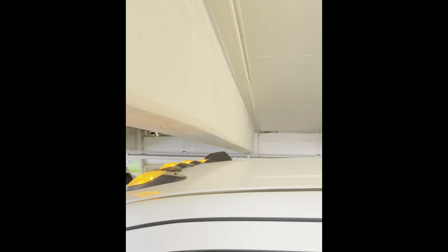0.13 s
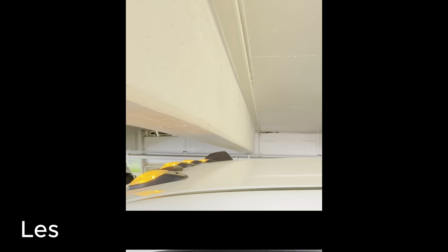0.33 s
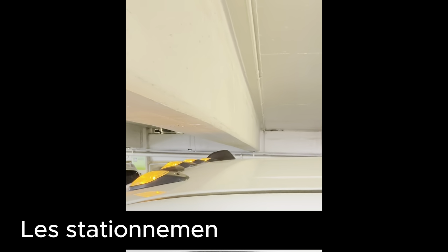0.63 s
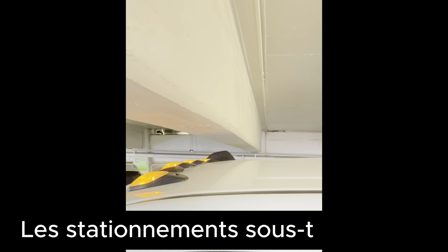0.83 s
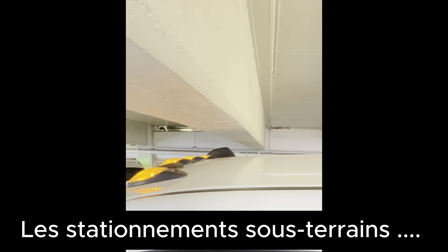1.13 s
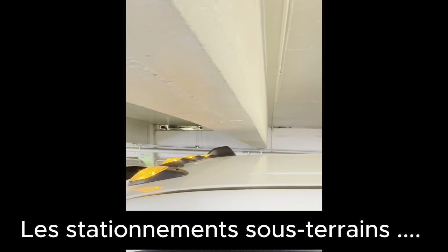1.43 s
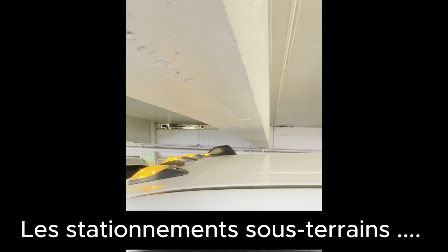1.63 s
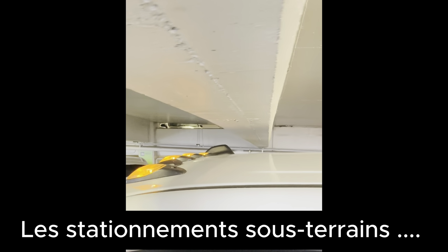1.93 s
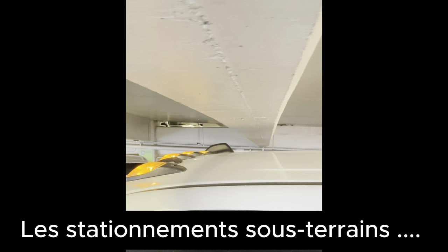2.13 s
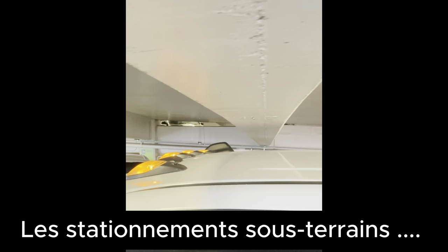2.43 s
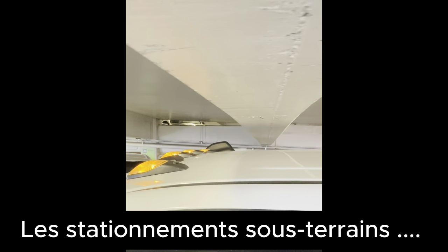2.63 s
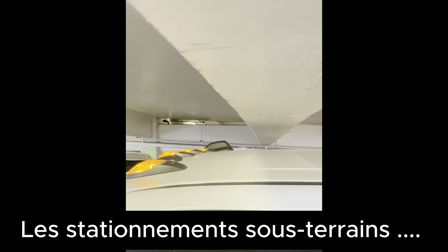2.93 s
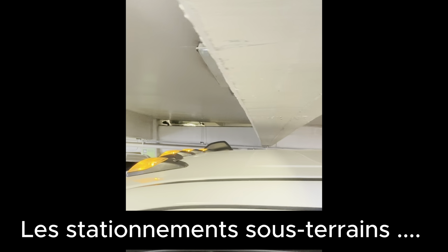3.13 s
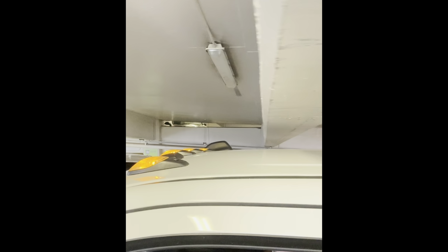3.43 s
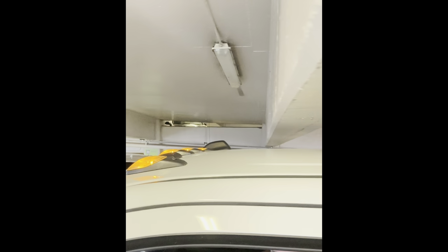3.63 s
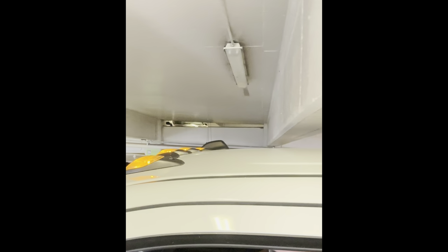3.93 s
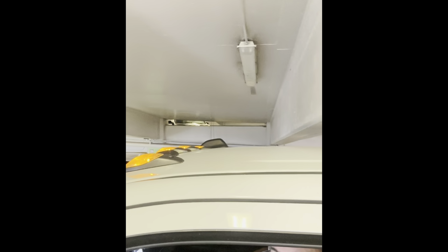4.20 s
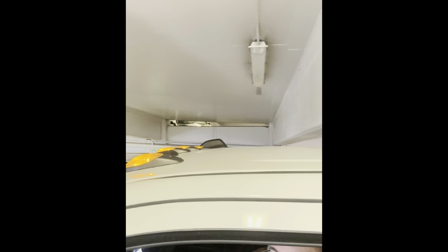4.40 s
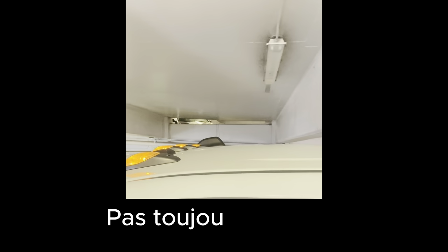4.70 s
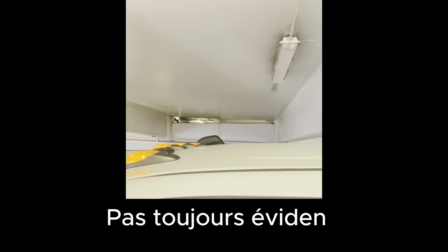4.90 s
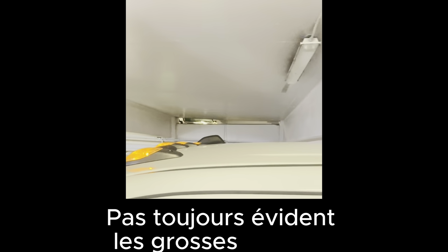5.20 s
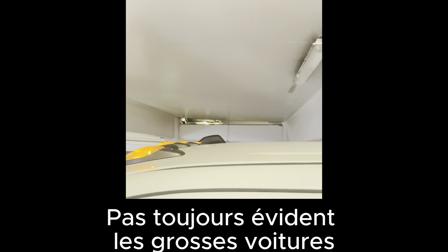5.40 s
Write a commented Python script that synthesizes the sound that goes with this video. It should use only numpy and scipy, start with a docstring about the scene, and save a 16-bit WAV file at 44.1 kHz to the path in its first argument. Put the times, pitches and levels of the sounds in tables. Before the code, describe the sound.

A big truck engine booms deep and steady at a fast idle, swelling and fading as it creeps through an echoing concrete garage.

```python
"""A deep exhaust boom throbs, swells and fades: a V8 pickup creeps through a concrete parking garage.
It is heard from above the roof, at a fast idle. Sine tones tied to the firing rate make boom and throb.
Shaped noise makes the gas rumble and the fan and engine roar that wash back from the walls.
Gliding tones drone up and then down as a low beam passes overhead.
Short damped tones make the few ticks and knocks of the body."""
import sys
import numpy as np
from scipy import signal
from scipy.fft import rfft, irfft
from scipy.io import wavfile
from scipy.ndimage import uniform_filter1d

SR = 44100
rng = np.random.default_rng(int(sys.argv[2]) if len(sys.argv) > 2 else 0)


def digitize_waveform(pressure):
    """Quantize a signal to 16-bit integers and store it at the path in sys.argv[1].

    Rows of a 2-D input are taken as channels; values are limited to [-1, 1].
    """
    field = np.atleast_2d(pressure).T
    bounded = np.clip(field, -1, 1)
    quanta = np.round(bounded * 32767).astype(np.int16)
    wavfile.write(sys.argv[1], SR, quanta)


N = 244887
TIME = np.arange(N) / SR  # seconds
BINS = np.fft.rfftfreq(N, 1 / SR)  # Hz


def amp(db):
    """Turns decibels into gain."""
    return 10 ** (np.asarray(db) / 20)


def unit(x):
    """Scales a signal to an rms of 1."""
    return x / np.sqrt(np.mean(x ** 2) + 1e-20)


def curves(rows):
    """Draws straight lines between the rows of a timed table, one curve per column."""
    s, *columns = np.transpose(rows)
    return [np.interp(TIME, s, column) for column in columns]


def colour(points):
    """Turns a table of pitch and dB into a gain at every frequency bin."""
    hz, db = np.transpose(points)
    return amp(np.interp(np.log(BINS + 1), np.log(hz), db))


def swell(peak_s, rise_s, fall_s):
    """A smooth hump from 0 to 1 and back, with its own time on each side."""
    width_s = np.where(TIME < peak_s, rise_s, fall_s)
    return np.exp(-((TIME - peak_s) / width_s) ** 2)


def drift(rate_hz):
    """Random motion of rms 1, with little left above the given rate."""
    spectrum = rfft(rng.standard_normal(N))
    return unit(irfft(spectrum / (1 + (BINS / rate_hz) ** 4), N))


def line(turns, scatter, rate_hz):
    """A tone of rms about 1 whose strength and phase waver as its echoes shift."""
    echoes = 1 + scatter * (drift(rate_hz) + 1j * drift(rate_hz))
    tone = np.exp(2j * np.pi * (turns + rng.random()))
    return np.sqrt(2) * (echoes * tone).real / np.sqrt(1 + 2 * scatter ** 2)


def ring(start_s, pitch_hz, t60_s, rise_s):
    """One damped vibration, struck at start_s, that dies by 60 dB in t60_s."""
    age = np.maximum(TIME - start_s, 0)
    decay = np.exp(-np.log(1000) * age / t60_s)
    return decay * (1 - np.exp(-age / rise_s)) * np.sin(2 * np.pi * pitch_hz * age)


def diffuse(gain):
    """Coloured noise from all around: much alike in both ears in the bass, less so in the treble."""
    # how wide the sound is: pitch_hz [Hz], side_minus_mid_db [dB]
    width_points = [(60, -18), (80, -35.5), (110, -10.5), (140, -27.5), (190, -16.5), (260, -20),
                    (350, -16.5), (470, -11.5), (630, -11.5), (840, -5.5), (1120, -0.5), (1510, 0),
                    (2020, -7.5), (2710, 1.5), (4500, -2.5), (10000, 4)]
    # which ear is louder: pitch_hz [Hz], left_minus_right_db [dB]
    lean_points = [(60, 7.5), (92, 8.5), (140, 1), (210, 1.5), (330, 2), (500, 2), (760, 0), (1160, -0.5),
                   (1770, -1.5), (2710, 0.5)]
    mid, side = rfft(rng.standard_normal((2, N))) * gain
    side = side * colour(width_points)
    ears = np.array([mid + side, mid - side])
    ears *= colour(lean_points) ** np.array([[.5], [-.5]])  # half the lean on each ear
    return irfft(ears, N) / np.std(irfft(mid, N))


def patchy(x, depth_db):
    """Shifting echoes favour narrow bands for a moment each."""
    z = signal.stft(x, nperseg=1024, noverlap=768)[2]
    field = rng.standard_normal(z.shape[1:])
    field = uniform_filter1d(field, size=2, axis=0)  # neighbouring bands
    field = uniform_filter1d(field, size=12, axis=1)  # neighbouring moments
    return signal.istft(z * amp(depth_db * unit(field)), nperseg=1024, noverlap=768)[1][:, :N]


def wash():
    """Fan and valve noise from the walls, smoothed by many echoes, with a thin hiss on top."""
    # relative noise colours: pitch_hz [Hz], level_db [dB per Hz]
    wash_colour = [(200, 0.5), (700, 5.5), (1100, 1.5), (1500, 0), (1830, -0.5), (2220, 0.5), (2300, -10),
                   (2480, -5.5), (3200, -9.5), (3400, -13), (4800, -29), (7000, -56.5)]
    hiss_colour = [(1500, -16.5), (3000, -1), (3900, 3), (4900, -0.5), (6250, -6), (6750, -5.5),
                   (7300, -62.5), (14000, -25)]
    wash_noise = amp(-35.5 + 0.7 * drift(24)) * diffuse(colour(wash_colour))
    hiss_noise = amp(-52) * diffuse(colour(hiss_colour))
    return patchy(wash_noise + hiss_noise, depth_db=2.5)


def whistles():
    """Narrow resonances in the wash: bands of noise whose levels waver."""
    # resonances: pitch_hz [Hz], half_width_hz [Hz], level_db [dB]
    resonances = [(1221, 12, -56), (1527, 24, -56.5), (1690, 39, -56.5), (2240, 65, -60.5),
                  (2433, 18, -55.5), (2574, 25, -60.5), (3130, 61, -67), (6600, 220, -71),
                  (9910, 700, -73.5)]
    out = np.zeros((2, N))
    for hz, half_width_hz, db in resonances:
        peak = 1 / (1 + ((BINS - hz) / half_width_hz) ** 2)
        out += amp(db + 2 * drift(13)) * diffuse(peak)
    return out


def roar(firings):
    """Engine noise that builds while a low beam nears, and drops once it is past."""
    # relative noise colours: pitch_hz [Hz], level_db [dB per Hz]
    roar_colour = [(100, -13.5), (200, -5.5), (280, 2.5), (400, 1), (500, 0), (580, -4), (680, -2.5),
                   (800, -8.5), (950, -14.5), (1500, -21.5), (4000, -71.5)]
    beam_colour = [(350, -31.5), (560, -3), (690, 2), (800, 2.5), (1000, -9.5), (2200, -17), (4000, -64)]
    beam = swell(peak_s=2.58, rise_s=2.7, fall_s=.51)
    # the two cylinder banks are not equally loud
    banks = unit(1 + .12 * np.cos(np.pi * firings))
    noise = amp(-32 + 3 * beam) * banks * diffuse(colour(roar_colour))
    # the beam throws back the upper roar
    noise += amp(-38.5) * beam * diffuse(colour(beam_colour))
    return patchy(noise, depth_db=1.0)


def rumble(firings):
    """Exhaust gas makes low noise that puffs once per firing and surges at random."""
    # loudness along the way: time_s [s], level_db [dB]
    level_points = [(0, -34.5), (.3, -30), (1.1, -31), (1.9, -30.5), (3.8, -33), (4.6, -33.5),
                    (5.55, -39.5)]
    # relative noise colour: pitch_hz [Hz], level_db [dB per Hz]
    rumble_colour = [(15, -20.5), (39, -13.5), (53, 0.5), (65, -3.5), (85, -3), (105, -1), (135, -3),
                     (165, 0), (230, -1), (330, -15), (700, -76)]
    level_db, = curves(level_points)
    puffs = unit(1 + .35 * np.cos(2 * np.pi * firings))
    return amp(level_db + 1.5 * drift(25)) * puffs * diffuse(colour(rumble_colour))


def engine_noise(firings):
    """Noise straight from the engine and exhaust, plus what the walls return."""
    # wash, hiss and whistles grow a little as the truck rolls on
    growth = amp(0.15 * (TIME - TIME.mean()))  # dB per second
    return rumble(firings) + roar(firings) + growth * (wash() + whistles())


def ticks():
    """Small dry clicks of a few high damped tones, each with a faint short scatter off the roof."""
    # clicks: start_s [s], level_db [dB], brightness [dB per octave]
    tick_times = [(.8238, -27.5, -7), (.8268, -34, -7), (.9928, -23.5, -1)]
    # what a tick rings with: pitch_hz [Hz], level_db [dB], t60_s [s]
    tick_modes = [(4700, 0, .0028), (6300, -3, .0015), (9500, 0, .002)]
    click = np.zeros(N)
    for s, db, bright in tick_times:
        for hz, mode_db, t60 in tick_modes:
            tilt_db = bright * np.log2(hz / tick_modes[0][0])
            click += amp(db + mode_db + tilt_db) * ring(s, hz, t60, rise_s=.00005)
    scatter = rng.standard_normal((2, 1200)) * amp(-60 * TIME[:1200] / .04)
    scatter /= np.linalg.norm(scatter[0])
    tail = signal.oaconvolve(click[None], scatter, axes=1)[:, :N]
    # the clicks reach the right ear one sample earlier
    return np.array([np.roll(click, 1), click]) + amp(-13) * tail


def knocks():
    """Dull knocks: each rings the body's low modes for a moment."""
    # knocks: start_s [s], level_db [dB], pitch_hz [Hz], t60_s [s]
    knock_times = [(2.675, -17, 140, .1), (2.802, -14, 200, .05), (3.085, -3.5, 165, .04),
                   (3.138, -12.5, 140, .12), (3.25, -17, 125, .09), (3.565, -18, 125, .07),
                   (3.825, -18, 140, .09), (3.958, -12.5, 125, .15)]
    # what a knock rings with: multiple of its pitch, level_db [dB]
    knock_modes = [(1, 0), (1.42, -3), (1.7, -11)]
    out = np.zeros(N)
    for s, db, hz, t60 in knock_times:
        for multiple, mode_db in knock_modes:
            out += amp(db + mode_db) * ring(s, hz * multiple, t60, rise_s=.005)
    return out


def drone(glide, blooms, smear):
    """Partials of one gliding pitch ring out where the room favours them, smeared by echoes."""
    hz, = curves(glide)
    turns = np.cumsum(hz) / SR
    out = np.zeros((2, N))
    for k in sorted({round(row[2]) for row in blooms}):
        level = sum(amp(db) * swell(s, half_s, half_s)
                    for s, half_s, multiple, db in blooms if round(multiple) == k)
        mid = line(k * turns, scatter=smear * k, rate_hz=16)
        # higher partials sound wider
        side = amp(-25.0 + 3.0 * k) * line(k * turns, scatter=0.8, rate_hz=9.0)
        out += level * np.array([mid + side, mid - side])
    return out * amp([[.6], [-.6]])  # a little louder on the left


def drones():
    """One drone climbs as the beam nears; a clearer one takes over behind it; perhaps tyre tread."""
    # glides: time_s [s], pitch_hz [Hz]
    rising_glide = [(0, 123), (.3, 128), (.55, 131), (1.05, 143), (1.35, 151), (1.7, 167), (2.2, 166),
                    (2.5, 171), (2.9, 164)]
    falling_glide = [(2.3, 132), (2.55, 130.6), (2.75, 128), (2.95, 121.3), (3.3, 120.8), (3.65, 122.3),
                     (4.6, 129), (5.55, 130)]
    # where a partial rings out: peak_s [s], half_length_s [s], multiple of the pitch, level_db [dB]
    rising_blooms = [(.1, 0.22, 1, -24.5), (0.437, 0.2, 2, -28), (.6, .45, 3, -34), (1.05, .28, 2, -31),
                     (1.1, 0.73, 5, -43.5), (1.25, 0.24, 3, -40.5), (1.3, 0.49, 1, -32.5),
                     (1.9, 0.53, 4, -39), (2.07, 0.2, 3, -35.5), (2.15, 0.24, 2, -35.5),
                     (2.4, 0.26, 5, -44.5), (2.7, 0.48, 3, -38.5)]
    falling_blooms = [(2.5, 0.13, 5, -34), (2.59, 0.21, 3, -30.5), (2.62, 0.17, 2, -31),
                      (2.69, 0.096, 1, -21), (2.98, 0.1, 3, -28.5), (3.22, .09, 3, -36),
                      (3.4, 0.25, 1, -27.5), (3.67, .09, 1, -23), (3.68, 0.16, 3, -36), (4.0, 0.28, 1, -32),
                      (4.55, .25, 3, -38.5)]
    rising = drone(rising_glide, rising_blooms, smear=0.2)
    return rising + drone(falling_glide, falling_blooms, smear=0.15)


def hums():
    """Belt-driven parts and panels hum at steady pitches, fading in and out along the way."""
    # hums: pitch_hz [Hz], level_db [dB before the throb level]
    hum_rows = [(53.5, -37), (69.9, -31), (84.2, -30.5), (99.5, -40.5), (134.5, -35.5), (139.6, -36.5),
                (223, -43)]
    return sum(amp(db + 2 * drift(0.96)) * line(hz * TIME, scatter=0.091, rate_hz=3.0)
               for hz, db in hum_rows)


def throb(cycles):
    """Unequal cylinders add tones at multiples of the eight-firing cycle."""
    # tones, each favoured by the room at one place: multiple of the cycle rate,
    # level_db [dB before the throb level], favoured_s [s], half_length_s [s], lift_db [dB]
    uneven_rows = [(6, -45.5, 0.8, 2.0, 6), (7, -28, 2.8, 0.4, 1.5), (9, -29.5, 1.3, 1.3, 1.5),
                   (10, -35, 0.61, 0.37, 2.5), (13, -35, 2.45, 0.46, 5.5), (15, -40, 4.2, .6, 8),
                   (16, -41, 3.1, 1.2, 6), (17, -44.5, 1.2, .6, 11), (18, -49.5, 2.2, 0.4, 10),
                   (21, -45, 2.6, .4, 6)]
    out = np.zeros(N)
    for k, db, s, half_s, lift_db in uneven_rows:
        level_db = db + lift_db * swell(s, half_s, half_s)
        out += amp(level_db) * line(round(k) * cycles, scatter=0.27, rate_hz=1.9)
    return out


def standing_wave():
    """The boom cancels in a notch as the truck rolls through each node of the standing wave."""
    # nodes: time_s [s], depth_db [dB], half_width_s [s]
    nodes = [(0.86, -17.5, 0.19), (5.022, -8, 0.19), (5.32, -7.5, 0.13)]
    gain = np.ones(N)
    for s, db, half_s in nodes:
        away = (TIME - s) / half_s
        gain *= np.hypot(amp(db), away) / np.hypot(1, away)
    return gain


def boom(firings, cycles):
    """A deep tone at the firing rate that swells and fades along the way."""
    # loudness before nodes and dips: time_s [s], level_db [dB]
    boom_points = [(0, -11), (.3, -9), (.65, -8), (1.2, -9.5), (1.5, -13), (1.85, -10.5), (2.1, -13.5),
                   (2.7, -11), (3.45, -9), (4.05, -11.5), (4.45, -12.5), (5.55, -15.5)]
    # brief dips between the swells: time_s [s], share lost [0-1]
    dip_rows = [(.14, 0.68), (0.781, 0.3), (1.085, 0.27), (1.196, 0.44), (1.36, 0.5), (1.52, .4),
                (1.925, 0.5), (2.14, .5), (2.30, 0.34), (3.239, 0.14), (3.99, 0.37)]
    level_db, = curves(boom_points)
    lope = 1 + .2 * np.cos(2 * np.pi * cycles)  # the strongest cylinders fire once a cycle
    dips = 1 - sum(share * swell(s, .027, .027) for s, share in dip_rows)
    tone = np.sqrt(2) * np.sin(2 * np.pi * firings)
    return amp(level_db) * standing_wave() * lope * dips * tone


def exhaust(firings):
    """The boom, the throb of unequal cylinders and the hums that beat against them."""
    # loudness of throb and hums together: time_s [s], level_db [dB]
    throb_points = [(0, 3), (.8, 2), (2.2, 2), (2.7, 0), (3.6, 0), (4.4, 1), (5.55, -0.5)]
    throb_db, = curves(throb_points)
    cycles = firings / 8
    mono = boom(firings, cycles) + amp(throb_db) * (throb(cycles) + hums())
    return mono * amp([[.2], [-.2]])  # slightly louder on the left


def scene():
    """One engine speed drives exhaust and noise; the drones and body sounds ride on top."""
    # engine speed: time_s [s], firing_rate_hz [Hz]
    firing_points = [(0, 65.8), (.45, 65.6), (.9, 64.4), (1.4, 64.9), (1.9, 64.9), (2.3, 64.55),
                     (5.55, 64.5)]
    firing_hz, = curves(firing_points)
    firings = np.cumsum(firing_hz) / SR  # firings counted so far
    return engine_noise(firings) + ticks() + knocks() + drones() + exhaust(firings)


def record(dry):
    """A steep low-pass filter, run forwards and backwards, removes the top treble."""
    edge_hz = 14500
    low_pass = signal.butter(12, edge_hz, fs=SR, output="sos")
    return signal.sosfiltfilt(low_pass, dry)


dry = scene()
out = record(dry)
digitize_waveform(out)
```